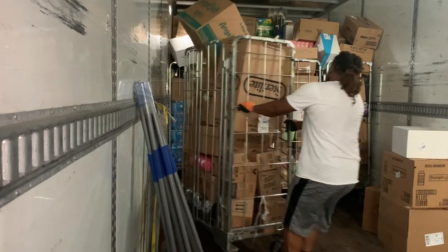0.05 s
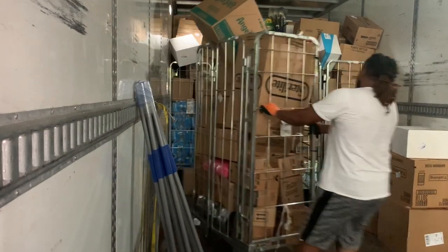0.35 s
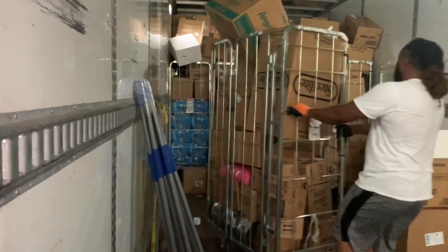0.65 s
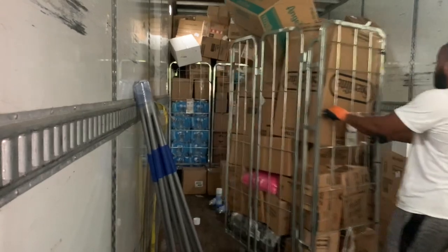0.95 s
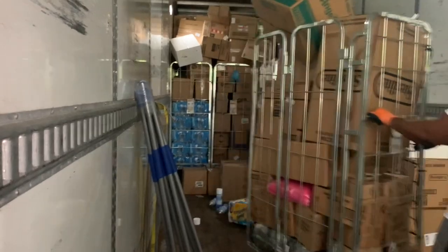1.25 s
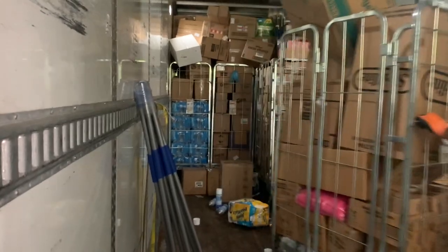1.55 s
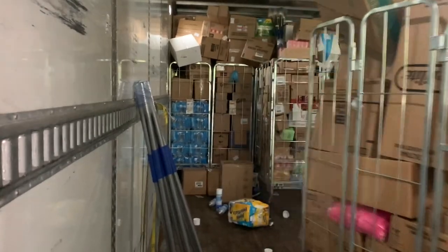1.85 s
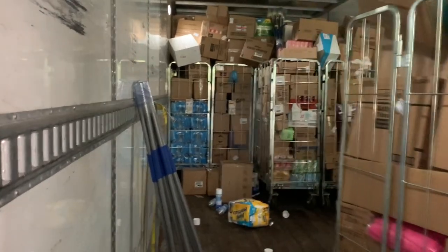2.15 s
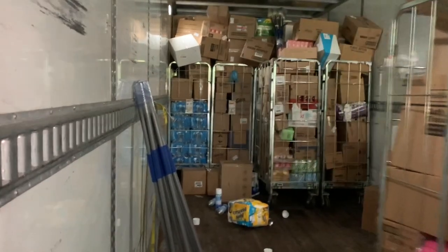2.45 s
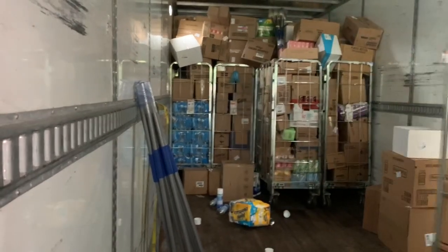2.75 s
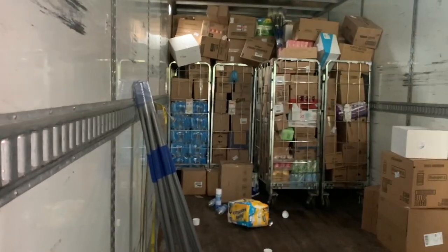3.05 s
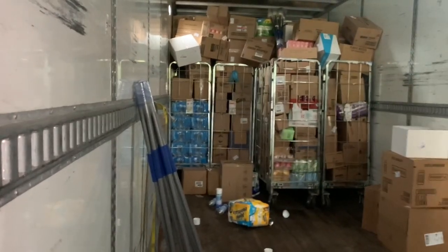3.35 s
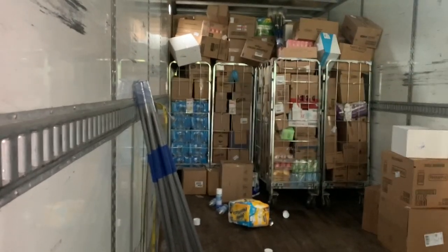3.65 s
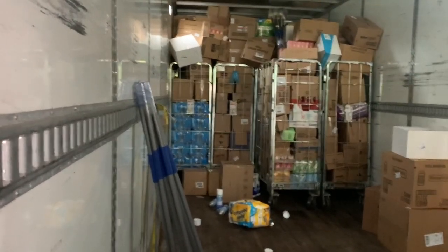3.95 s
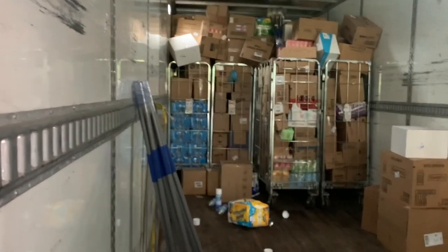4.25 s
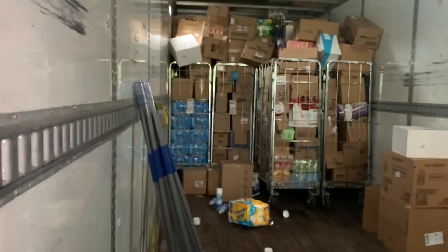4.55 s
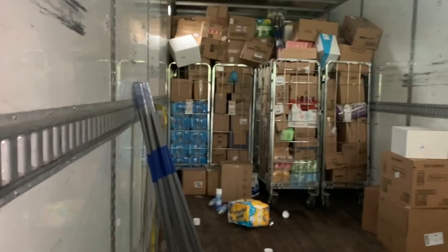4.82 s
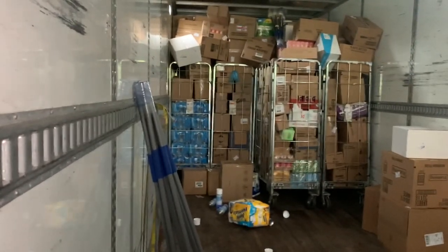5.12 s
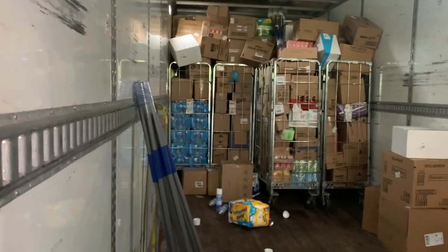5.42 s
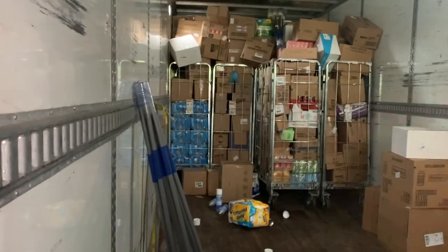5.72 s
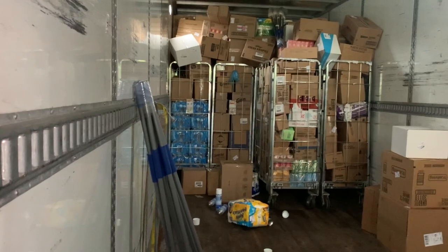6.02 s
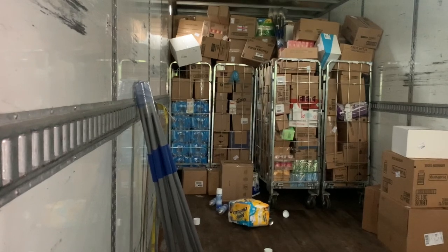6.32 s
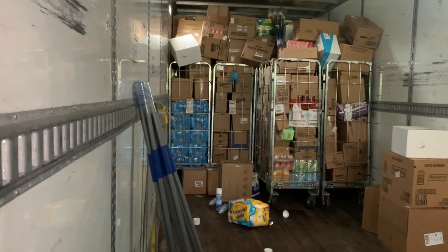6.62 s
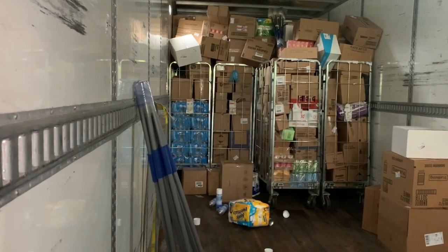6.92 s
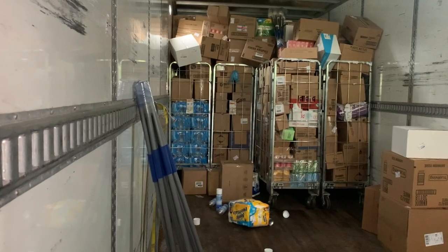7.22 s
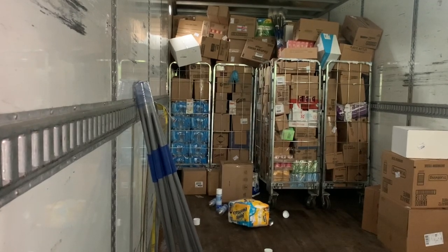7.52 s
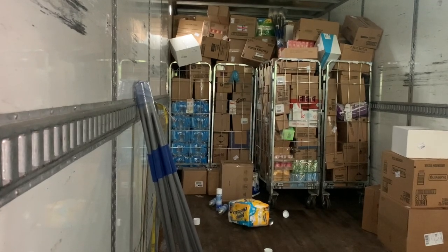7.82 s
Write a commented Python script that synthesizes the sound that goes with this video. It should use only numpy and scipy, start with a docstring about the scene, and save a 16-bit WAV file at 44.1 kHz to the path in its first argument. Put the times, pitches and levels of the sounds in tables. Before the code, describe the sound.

Casters drum over a hollow trailer deck as a loaded wire cage rattles, knocks and squeaks past, then recedes.

```python
"""A hollow rumble and a rattle of wire: a loaded roll cage is hauled out of a lorry trailer, passes on
the right and rolls away. Its casters (small swivelling wheels) drum and thump on the deck, crunch over
grit and squeak. The wire sides chatter at every jolt, the load knocks, loudest at the start, and later
a steel clasp clinks. The bare trailer walls echo, over the dull roar of the loading bay."""
import sys
import numpy as np
from scipy import signal
from scipy.fft import rfft, irfft, next_fast_len
from scipy.io import wavfile
from scipy.ndimage import uniform_filter1d

SR = 44100
rng = np.random.default_rng(int(sys.argv[2]) if len(sys.argv) > 2 else 0)


def materialize(psi):
    """Save the field psi as 16-bit PCM at rate SR to the path in sys.argv[1].

    A 1-D psi becomes a single channel; in a 2-D psi each row is a channel.
    """
    bounded = np.clip(np.atleast_2d(psi).T, -1, 1)
    quanta = np.round(bounded * 32767).astype(np.int16)
    wavfile.write(sys.argv[1], SR, quanta)


N = 351873


def amp(db):
    """Turn decibels into a number to multiply by."""
    return 10 ** (np.asarray(db) / 20)


def unit(x):
    """Scale x to an average power of 1."""
    return x / np.sqrt(np.mean(x ** 2) + 1e-20)


def along(points, hz):
    """Read a (frequency, value) table between its rows, on a log scale."""
    f, v = np.transpose(points)
    return np.interp(np.log(hz + 1), np.log(f + 1), v)


def curves(rows):
    """Join timed rows with straight lines: one curve for each column after the time."""
    s, *cols = np.transpose(rows)
    return [np.interp(np.arange(N) / SR, s, c) for c in cols]


def humps(rows):
    """A smooth rise and fall in dB around each row's time."""
    t = np.arange(N) / SR
    return sum(db * np.cos(np.pi * np.clip((t - s) / length, -.5, .5)) ** 2 for s, length, db in rows)


def filtered(x, response):
    """Scale and delay each frequency f in x by response(f)."""
    size = x.shape[-1]
    padded = next_fast_len(size + SR // 2)
    return irfft(rfft(x, padded) * response(np.fft.rfftfreq(padded, 1 / SR)), padded)[..., :size]


def band(f, hz, width):
    """One resonance: it lets through the frequencies near hz."""
    return 1j * f * width / (hz * hz - f * f + 1j * f * width)


def stereo(f, lag_ms):
    """Left and right responses to a sound that reaches the left lag_ms later."""
    return np.exp(np.pi * 1j * f * lag_ms / 1000 * np.array([[-1], [1]]))


def add(track, s, sound):
    """Mix a sound into a track from time s on."""
    start = max(round(s * SR), 0)
    track[start:start + len(sound)] += sound[:N - start]


def contacts(rate, spread_db):
    """Tiny hits at random times, about rate a second, their sizes scattered by spread_db."""
    size = amp(spread_db * np.clip(rng.standard_normal(N), -2, 2)) * rng.choice([-1, 1], N)
    return unit(size * (rng.random(N) < rate / SR))


def ring(notes):
    """One blow sets an object's own notes ringing, each at a slightly new strength."""
    t = np.arange(SR // 2) / SR
    hz, db, fade = np.transpose(notes)[:, :, None]
    strength = db + rng.standard_normal(hz.shape)
    phase = 2 * np.pi * (hz * t + rng.random(hz.shape))
    wave = np.sum(amp(strength - 60 * t / fade) * np.sin(phase), 0)
    return wave / np.linalg.norm(wave)


def burst(fade_s):
    """A dying puff of noise. A fade time is how long a sound takes to drop 60 dB."""
    t = np.arange(SR // 2) / SR
    return amp(-60 * t / fade_s) * rng.standard_normal(len(t))


def drummed(notes, evenness):
    """Notes kept ringing by wheel bumps; a steady pull evens out their swells (evenness 0 to 1)."""
    wave = 0
    for hz, width, db in notes:
        bumps = contacts(rate=900, spread_db=3)
        wave += amp(db) * filtered(bumps, lambda f: band(f, hz, 2 * width) ** 2)
    power = np.abs(uniform_filter1d(uniform_filter1d(wave ** 2, SR // 10), SR // 20)) + 1e-12
    return unit(wave / power ** (evenness / 2))


# how long the trailer echoes: f/Hz, fade/s
ECHO_FADE = [(200, 0.33), (1500, 0.15), (5000, 0.2), (14000, 0.043)]
PASS_S, PASSING_S = 1.13, 0.59  # when the cage passes, and how long that takes
def trailer(x, echo_db, wall_db=-7):
    """Sound arrives directly, then off the near left wall, then as a wash of echoes."""
    passed = np.clip((np.arange(N) / SR - PASS_S) / PASSING_S + .5, 0, 1)
    # the right side hears it first, then the left once the cage has passed
    out = filtered(x * np.sqrt(1 - passed), lambda f: stereo(f, lag_ms=0.29))
    out += filtered(x * np.sqrt(passed), lambda f: stereo(f, lag_ms=-.465))
    bounce = lambda f: stereo(f, lag_ms=-.476) * np.exp(-2j * np.pi * f * .0031)  # 3.1 ms late
    out += filtered(x, lambda f: amp(wall_db) * bounce(f) / (1 + (f / 5000) ** 2))
    hop = SR // 7
    for start in range(0, N, hop):  # the echo pattern changes as the cage moves
        hz, t, noise = signal.stft(rng.standard_normal((2, SR // 2)), SR, nperseg=256)
        dying = amp(-60 * t / along(ECHO_FADE, hz)[:, None])
        tail = signal.istft(noise * dying, SR, nperseg=256)[1]
        echo = signal.fftconvolve(x[None, start:start + hop], tail / np.linalg.norm(tail[0]), axes=1)
        for side, sound in zip(out, echo):
            add(side, start / SR, amp(echo_db) * sound)
    return out / np.sqrt(1 + amp(echo_db) ** 2)


# how hard the cage rolls: t/s, drumming level/dB, load shudder level/dB
ROLLING = [(0, -32.5, -38.5), (0.3, -31.5, -39.5), (0.55, -28, -37), (0.75, -24.5, -35.5),
           (0.98, -27.5, -39), (1.24, -26, -36), (1.42, -28.5, -33.5), (2.0, -28, -37), (2.5, -25.5, -35.5),
           (2.95, -26, -36), (3.15, -25, -42), (3.4, -21, -32.5), (3.65, -24.5, -38.5), (3.98, -23, -37.5),
           (4.5, -27.5, -38.5), (5.05, -27, -42.5), (5.85, -32.5, -49), (6.6, -33, -44.5),
           (7.98, -32.5, -52.5)]
# share of the rumble in one booming note: t/s, deck share/0-1, panel share/0-1
BOOM_SHARES = [(0, 0.2, 0.16), (0.8, 0.32, 0), (1.1, 1, 0.07), (1.6, 0.38, 0.04), (2.1, 0.55, 0.37),
               (2.9, 0.2, 0.8), (3.4, 0.06, 1), (4.0, 0.98, 0.72), (5.0, 0.58, 0.82), (5.8, 0.14, 0),
               (7.98, 0.47, 0.22)]
# the trailer bed bends slowly under the weight: t/s, level/dB
BED_FLEX = [(0, -35), (0.6, -39), (1.3, -25), (2.0, -37), (2.7, -27.5), (3.4, -32), (3.9, -33), (4.5, -43),
            (5.3, -57), (6.2, -56), (7.98, -49)]
# the deck heaves at uneven stretches: t/s, length/s, rise/dB
DECK_HEAVES = [(0.152, 0.1, 9), (1.1, 0.45, 4), (1.623, 0.27, 4.5), (2.13, 0.17, 5), (4.45, 0.46, 5),
               (4.896, 0.12, 4.5)]
# the panels drone on as the cage crosses the end of the deck: t/s, length/s, rise/dB
PANEL_DRONE = [(4.7, 1.7, 1.5)]
# the notes of the bed, deck, panels and load: f/Hz, width/Hz, level/dB
BED_NOTES = [(34, 4.1, 2), (45, 7.2, -7.5)]
DECK_NOTES = [(53.9, 25, -16), (65.5, 8.8, -2.5), (83.4, 17.8, -7.5)]
PANEL_NOTES = [(120.5, 29, -2), (141.2, 17.6, 5), (164.7, 34, -11.5), (189.3, 20.5, -7)]
LOAD_NOTES = [(249, 25.8, -0.5), (275.3, 12.4, 3.5), (289.6, 12.5, -6), (360, 28.5, -12), (407, 10, -14.5)]
def rumble():
    """The casters drum on the hollow deck and shake the bed, the panels and the load."""
    roll_db, load_db = curves(ROLLING)
    deck_share, panel_share = curves(BOOM_SHARES)
    bed = amp(curves(BED_FLEX)[0]) * drummed(BED_NOTES, evenness=1)
    deck = np.sqrt(1 - deck_share) * drummed(DECK_NOTES, evenness=1)
    deck += np.sqrt(deck_share) * drummed([(67.8, 6.05, 0)], evenness=1)
    deck *= amp(roll_db + 1 + humps(DECK_HEAVES))
    drone = amp(humps(PANEL_DRONE)) * drummed([(143.5, 6.5, 0)], evenness=0.85)
    panels = np.sqrt(1 - panel_share) * drummed(PANEL_NOTES, evenness=0.76)
    panels += np.sqrt(panel_share) * drone
    load = amp(load_db - 1) * drummed(LOAD_NOTES, evenness=0.03)
    return bed + deck + amp(roll_db - 0.43) * panels + load


# wheels on the gritty floor: t/s, grinding level/dB, crunch level/dB
GRIT_LEVELS = [(0, -51, -52), (0.17, -58, -57.5), (0.35, -47, -50.5), (0.9, -45.5, -50.5), (1.15, -44, -47),
               (1.55, -49.5, -48.5), (1.92, -52, -52), (2.03, -46, -50), (2.7, -49.5, -50),
               (3.25, -48.5, -49), (3.6, -44.5, -44.5), (4.15, -48.5, -47.5), (4.8, -46, -51.5),
               (5.25, -51.5, -51.5), (5.62, -45.5, -55), (6.05, -51, -57.5), (6.8, -54, -60),
               (6.95, -51.5, -56.5), (7.25, -52.5, -66), (7.98, -55.5, -60)]
# a wheel scuffs as it swivels: t/s, length/s, rise/dB
SWIVEL_SCUFFS = [(1.245, 0.067, 6.5), (4.23, 0.12, 0.5), (4.98, 0.08, 3)]
# the tone of the grit: f/Hz, level/dB
GRIT_TONE = [(120, -0.5), (300, 10.5), (500, 6.5), (650, 0), (1100, 1), (1500, -1.5), (2000, -2.5),
             (3000, -8), (4500, -10.5), (7000, -18), (14000, -74)]
# the notes of the cage's frame: f/Hz, width/Hz, level/dB
FRAME_NOTES = [(714, 36, -1), (1110, 31, -13), (1210, 35, -8)]
def grit_crunch(split_hz=1200):
    """Hard wheels grind on the floor and crush fine grit; the frame rings faintly along."""
    grind_db, crunch_db = curves(GRIT_LEVELS) + humps(SWIVEL_SCUFFS)
    frame = lambda f: 1 + sum(amp(db) * band(f, hz, width) for hz, width, db in FRAME_NOTES)
    grains = contacts(rate=2000, spread_db=9)
    grit = unit(filtered(grains, lambda f: amp(along(GRIT_TONE, f)) * frame(f)))
    crunch = filtered(grit, lambda f: 1 / (1 + (split_hz / (f + 1)) ** 4))  # the high part
    grind = grit - crunch
    return trailer(amp(grind_db + 2) * grind + amp(crunch_db + 4.5) * crunch, echo_db=5)


# the tone of the bright ticks, with a deep gap near 12 kHz that is not the wire's own: f/Hz, level/dB
TICK_TONE = [(600, 4), (1500, -0.5), (2600, -2.5), (4200, -1), (6200, -2), (7500, -2), (8600, -0.5),
             (10700, 0), (12000, -66), (14000, -2), (15500, -30)]
# the notes of the wire mesh: f/Hz, width/Hz, level/dB
MESH_NOTES = [(1900, 70, -4), (2093, 45, -5), (3030, 40, -5), (3417, 16, -9), (3800, 16, 2), (4544, 30, -5),
              (5268, 25, -8), (5520, 25, -1), (6045, 30, -2), (6452, 30, -9), (7137, 30, -5),
              (8355, 40, -6), (8781, 45, -8), (9733, 25, -6)]
def wire_mesh(hits):
    """Hits on the mesh turn into bright ticks and set it ringing."""
    ringing = lambda f: 1 + sum(amp(db) * band(f, hz, width) for hz, width, db in MESH_NOTES)
    return filtered(hits, lambda f: amp(along(TICK_TONE, f) + 3.5) * ringing(f))


def shaking(hold_s, rise_s, fade_s):
    """The strength of one rattle: it builds up, holds, then dies away."""
    t = np.arange(SR) / SR
    return (1 - np.exp(-t / rise_s)) * amp(-60 * np.maximum(t - hold_s, 0) / fade_s)


# jolts throw the sides against the frame: t/s, hold/s, rattle level/dB, sizzle level/dB
SIDE_JOLTS = [(0.0, 0.044, -51.5, -49), (0.195, 0.065, -49.5, -54), (0.268, 0.014, -47, -50),
              (0.347, 0.011, -56.5, -51), (0.416, 0.11, -53.5, -49.5), (0.651, 0.021, -52, -63),
              (0.694, 0.016, -48.5, -52), (0.785, 0.063, -47.5, -50), (0.854, 0.011, -58, -68),
              (0.977, 0.14, -51.5, -56), (1.102, 0.015, -48, -59), (1.224, 0.016, -68, -67),
              (1.348, 0.11, -50.5, -53), (1.595, 0.014, -53, -40.5), (1.648, 0.1, -56.5, -61),
              (1.79, .01, -57, -59), (1.857, 0.18, -53, -50.5), (2.059, .2, -54, -59),
              (2.42, 0.065, -49, -54), (2.506, 0.0086, -54, -62), (2.63, 0.05, -54, -54),
              (2.885, 0.086, -48.5, -53), (3.011, 0.046, -57.5, -68), (3.166, 0.018, -49, -52),
              (3.348, 0.012, -54, -64), (3.47, 0.084, -52.5, -59), (3.764, 0.0073, -64, -64),
              (3.972, 0.015, -47.5, -54), (4.093, .01, -50, -64), (4.122, 0.035, -59, -64),
              (4.244, 0.0089, -72, -72), (4.478, 0.013, -52, -63), (4.539, 0.015, -63, -65),
              (4.665, 0.028, -46.5, -50), (4.905, 0.063, -52.5, -61), (4.96, 0.058, -55, -64),
              (5.312, 0.034, -59, -68), (5.474, 0.043, -56.5, -65), (5.649, 0.048, -59.5, -58),
              (5.888, 0.017, -59, -63), (6.169, 0.073, -57.5, -59), (6.437, 0.019, -60, -60),
              (6.89, 0.044, -65, -71), (7.091, 0.049, -61.5, -64), (7.354, 0.053, -54.5, -62),
              (7.602, 0.041, -56.5, -65)]
def wire_rattle():
    """Loose wires tick against each other, hardest at the jolts; the loose clasp sings faintly."""
    shake, fizz = np.zeros((2, N))
    for s, hold, db, sizzle_db in SIDE_JOLTS:
        add(shake, s, amp(db) * shaking(hold, rise_s=0.0013, fade_s=0.38))
        add(fizz, s, amp(sizzle_db) * shaking(hold, rise_s=0.0012, fade_s=0.37))
    # between jolts, a softer rattle follows the crunch
    crunch_db = curves(GRIT_LEVELS)[1]
    shake = np.hypot(shake, amp(crunch_db - 10.5))
    fizz = np.hypot(fizz, amp(crunch_db - 16.5))
    # a dense jingle with a few harder ticks standing out
    chatter = amp(0.6) * contacts(rate=400, spread_db=0) + amp(-2) * contacts(rate=60, spread_db=4)
    # the lightest touches only sizzle, very high up
    sizzle = unit(filtered(contacts(rate=750, spread_db=4), lambda f: band(f, 13300, 3600) ** 2))
    clasp = unit(filtered(contacts(rate=120, spread_db=5), lambda f: band(f, 8130, 350) ** 2))
    clasp *= amp(-71 - 0.9 * np.arange(N) / SR)  # fades with distance
    return trailer(wire_mesh(shake * chatter) + fizz * sizzle + clasp, echo_db=7)


# the tone of the loading bay: f/Hz, level/dB
BAY_TONE = [(25, -8), (70, 5), (130, -4.5), (195, 3.5), (240, -15), (320, -17), (550, -24), (800, -26),
            (1500, -27.5), (4000, -37.5), (8000, -44.5), (14000, -47.5)]
def bay_roar(level_db=-40, mono_hz=330):
    """The loading bay's steady, dull roar, alike left and right only in the bass."""
    mid, side = rng.standard_normal((2, N))
    side = filtered(side, lambda f: f ** 2 / (f ** 2 + mono_hz ** 2))
    noise = np.array([mid + side, mid - side])
    return amp(level_db) * unit(filtered(noise, lambda f: amp(along(BAY_TONE, f))))


# single hard hits of a wire on the frame: t/s, level/dB
WIRE_HITS = [(0.195, -56), (0.345, -46), (0.417, -43), (0.46, -38.5), (0.695, -39), (0.784, -37.5),
             (0.866, -41), (0.979, -49), (0.995, -54), (1.103, -39), (1.224, -40), (1.35, -44),
             (1.595, -43), (1.648, -38), (1.662, -49), (1.789, -45), (2.409, -47), (2.423, -50),
             (2.506, -39), (2.664, -40.5), (2.716, -45.5), (2.887, -51), (3.166, -43), (3.348, -39.5),
             (3.556, -40), (3.763, -41), (3.972, -41.5), (4.093, -44), (4.122, -42), (4.477, -41),
             (5.326, -45), (7.354, -51)]
# the notes of a struck bar: f/Hz, level/dB, fade/s
BAR_NOTES = [(2560, -4, .07), (3800, -7, .1), (4545, -2, .07), (5080, -3, .05), (5400, -3, .06),
             (6045, -5, .1), (7137, -6, .07), (8355, -3, .07)]
def wire_strikes():
    """A wire hits the frame: a short crack runs through the mesh and a bar rings."""
    cracks, bars = np.zeros((2, N))
    for s, db in WIRE_HITS:
        add(cracks, s, amp(db + 1) * burst(fade_s=0.02))
        add(bars, s, amp(db + 19) * ring(BAR_NOTES))
    return trailer(wire_mesh(cracks) + bars, echo_db=1.5)


# knocks of the load: t/s, level/dB, lowest f/Hz, highest f/Hz, extra thud/dB
LOAD_KNOCKS = [(0.227, -20.5, 340, 910, -14), (0.243, -25.5, 610, 940, -13), (0.356, -29.5, 810, 1400, -9),
               (0.553, -27.5, 503, 1210, -9), (2.035, -39.5, 397, 1500, -7), (3.51, -40, 450, 1200, 1),
               (4.103, -31.5, 550, 2400, 0), (4.155, -35, 500, 2200, 2), (5.28, -41, 420, 990, -6),
               (5.588, -34.5, 600, 1300, -10), (5.66, -40, 550, 1200, -4), (6.425, -41, 450, 1100, 3),
               (6.897, -40, 450, 1800, -1), (6.932, -37, 500, 2190, 0), (7.092, -39.5, 446, 2000, 3),
               (7.956, -40, 500, 2000, -5)]
# the notes of the cage's base: f/Hz, level/dB, fade/s
BASE_NOTES = [(393, -4, .09), (505, 0, .06), (570, -3, .05), (655, -8, .05), (721, 0, .1), (805, 0, .085),
              (888, -2, .075), (1116, -6, .07), (1243, -4, .07), (1860, -9, .06)]
def load_knocks():
    """The load shifts and knocks the base: crisp while near, mostly echo once the cage has passed."""
    near, far = np.zeros((2, N))
    for s, db, low_hz, high_hz, thud_db in LOAD_KNOCKS:
        blow = ring(BASE_NOTES) + amp(thud_db - 15.5) * burst(fade_s=.08)
        passband = signal.butter(3, [low_hz, high_hz], "band", fs=SR, output="sos")
        blow = signal.sosfilt(passband, blow)
        add(near if s < PASS_S else far, s, amp(db) * blow / np.max(np.abs(blow)))
    lean_left = amp([[1.5], [-1.5]])
    return lean_left * trailer(near, echo_db=-8, wall_db=-15) + trailer(far, echo_db=4)


# squeaks: middle t/s, length/s, f/Hz, level/dB, pitch wobble/0-1
CASTER_SQUEAKS = [(0.278, 0.064, 2590, -47, 0.02), (0.468, 0.047, 2510, -48, 0), (4.58, 0.15, 3840, -62, 0),
                  (6.584, 0.17, 3710, -60, 0.045), (7.63, 0.16, 1396, -53.5, 0.2),
                  (7.695, .16, 3280, -56.5, 0.07)]
def caster_squeaks():
    """A dry caster rubs in short, unsteady squeaks."""
    track = np.zeros(N)
    for s, length, hz, db, wobble in CASTER_SQUEAKS:
        count = int(length * SR)
        pitch = hz * (1 + wobble * unit(uniform_filter1d(rng.standard_normal(count), size=64)))
        phase = 2 * np.pi * np.cumsum(pitch) / SR
        overtone = amp(-5 - 2 * s) * np.sin(2 * phase)  # distance takes it away
        add(track, s - length / 2, amp(db) * np.hanning(count) * (np.sin(phase) + overtone))
    return trailer(track, echo_db=5)


# a caster drops off a bump: t/s, deck level/dB, panel level/dB
CASTER_DROPS = [(0.646, -15, -20), (0.746, -20, -17), (1.051, -18, -45), (1.225, -22.5, -16.5),
                (1.837, -27, -21), (2.008, -15.5, -26), (2.44, -21, -37), (2.611, -14, -17.5),
                (2.7, -24, -26), (2.799, -17.5, -17.5), (2.91, -15.5, -15.5), (3.041, -14, -13.5),
                (3.165, -13.5, -44), (3.346, -20, -13), (3.479, -14, -24), (3.615, -25, -15),
                (3.761, -12, -27), (3.933, -19, -13), (4.269, -28, -24), (4.366, -19, -17.5),
                (6.041, -22, -22.5), (6.17, -16.5, -35), (6.337, -21, -32), (6.406, -22, -40),
                (6.534, -22, -37), (6.614, -21.5, -35), (6.856, -20, -39), (6.933, -20.5, -21),
                (7.2, -26, -28.5), (7.376, -28, -23), (7.682, -42, -24.5)]
def caster_thumps(rise_s=0.01988):
    """Each drop of a caster pushes the deck and its panels, which swell and ring out."""
    track, t = np.zeros(N), np.arange(SR // 2) / SR
    push = t / rise_s * np.exp(1 - t / rise_s)
    for s, deck_db, panel_db in CASTER_DROPS:
        for notes, level_db in ((DECK_NOTES, deck_db), (PANEL_NOTES, panel_db)):
            hz, _, db = np.transpose(notes)[:, :, None]
            phase = 2 * np.pi * (hz * (t - rise_s) + rng.random())
            strength = amp(db + 2 * rng.standard_normal(hz.shape))
            wave = push * np.sum(strength * np.sin(phase), 0)
            add(track, s, amp(level_db) * wave / np.max(np.abs(wave)))
    return track


# hard clinks of steel on steel: t/s, level/dB
CLASP_HITS = [(4.9568, -47), (4.9593, -42), (4.9667, -44.5), (5.326, -51.5)]
# the notes of the clasp: f/Hz, level/dB, fade/s
CLASP_NOTES = [(4107, -17, .05), (4549, -9, .06), (4900, -4, .04), (5270, -4, .07), (6045, -12, .04),
               (8107, -9, .08), (8355, 0, .05), (8600, -1, .022), (8830, -3, .03), (9080, -5, .04),
               (9921, -9, .04)]
def clasp_clinks():
    """A steel clasp snaps against the frame and rings, louder on the right."""
    track = np.zeros(N)
    tone = lambda f: amp(along(TICK_TONE, f)) / (1 + (f / 11000) ** 6)
    for s, db in CLASP_HITS:
        crack = filtered(burst(fade_s=0.096), tone)
        add(track, s, amp(db) * (amp(30) * ring(CLASP_NOTES) + amp(7) * crack))
    return amp([[-2], [1.5]]) * trailer(track, echo_db=-4)


def scene():
    """Everything the rolling cage sets going, over the roar of the bay."""
    # long, low waves are equally loud on both sides and reach the left first
    low = filtered(rumble() + caster_thumps(), lambda f: stereo(f, lag_ms=-0.15))
    return (low + grit_crunch() + wire_rattle() + bay_roar() + wire_strikes()
            + load_knocks() + caster_squeaks() + clasp_clinks())


# how much louder the microphone's right side is than its left: f/Hz, level/dB
RIGHT_OVER_LEFT = [(150, 1.9), (320, -2), (520, 1), (3000, -1), (6000, 1), (7900, 1.5), (8100, 8),
                   (10000, 4), (11500, -0.5)]
def record(dry, roll_off_hz=14600, top_hz=15700):
    """The microphone colours its two sides differently and loses the very highest treble."""
    balance = lambda f: amp(along(RIGHT_OVER_LEFT, f) * np.array([[-.5], [.5]]))
    roll_off = lambda f: 1 / (1 + (f / roll_off_hz) ** 80)
    return filtered(dry, lambda f: balance(f) * roll_off(f) * (f < top_hz))


dry = scene()
out = record(dry)
materialize(out)
```